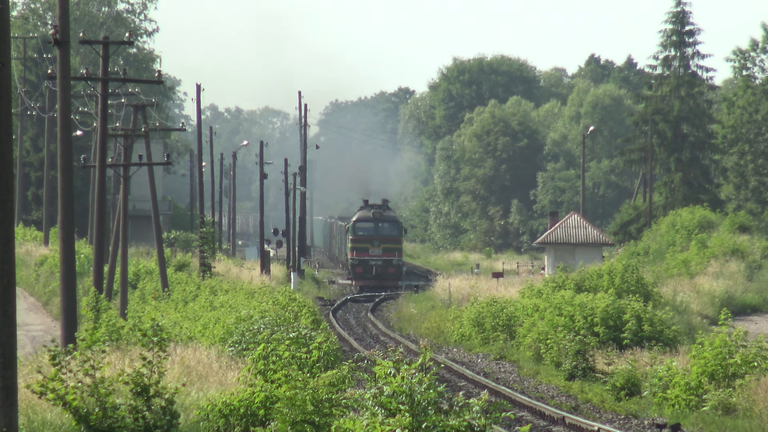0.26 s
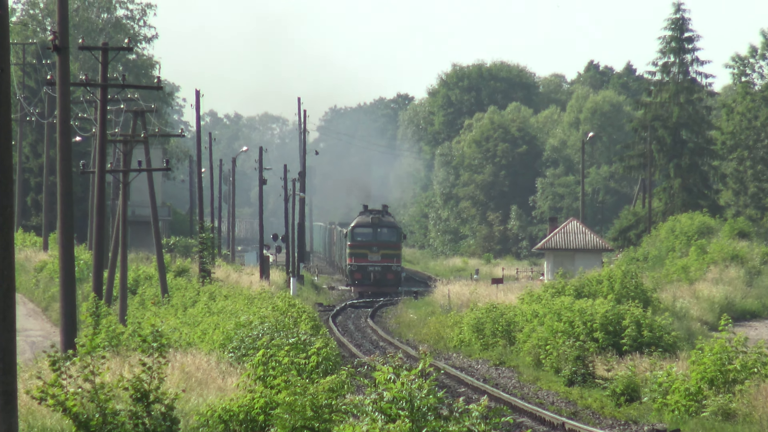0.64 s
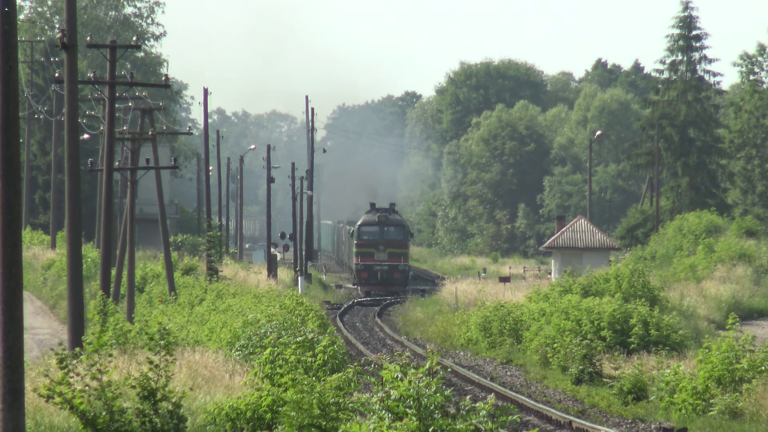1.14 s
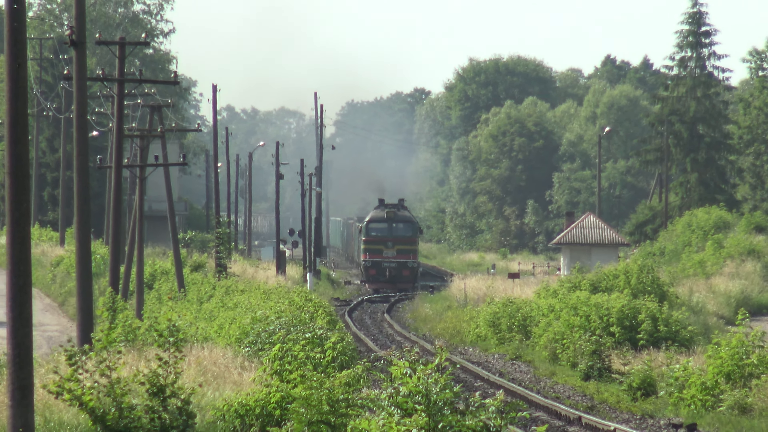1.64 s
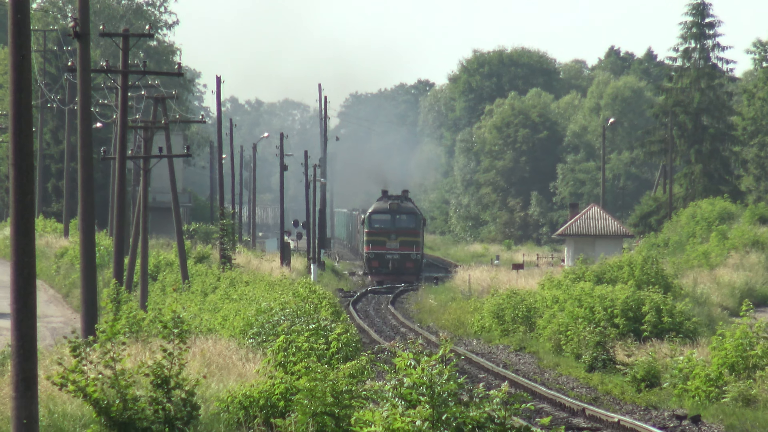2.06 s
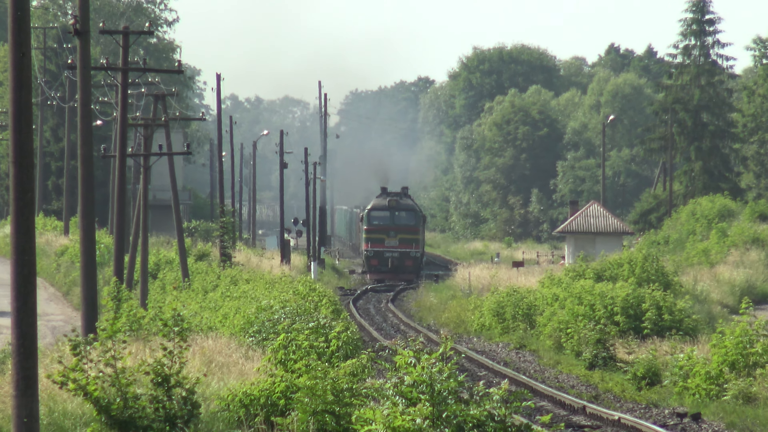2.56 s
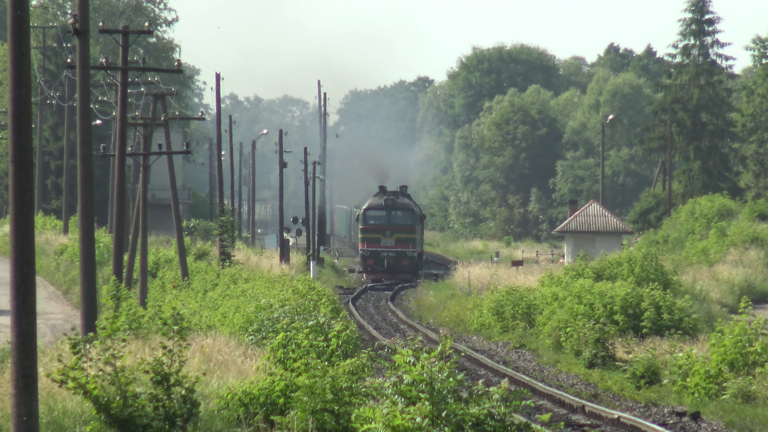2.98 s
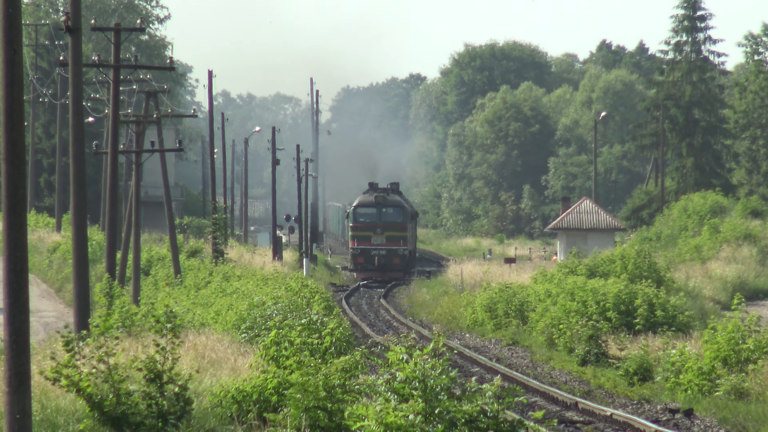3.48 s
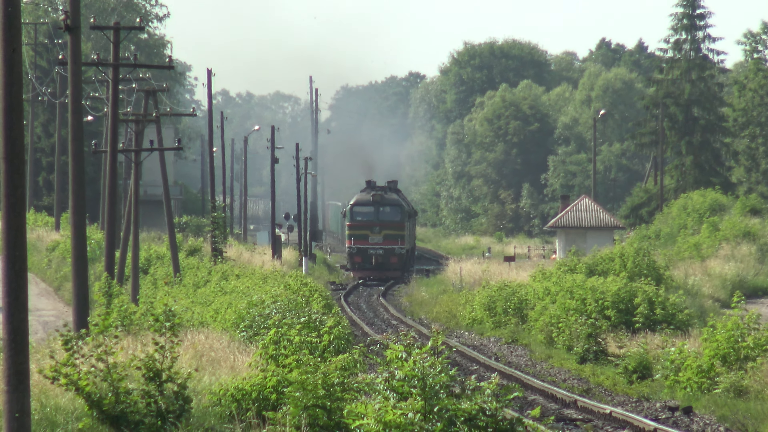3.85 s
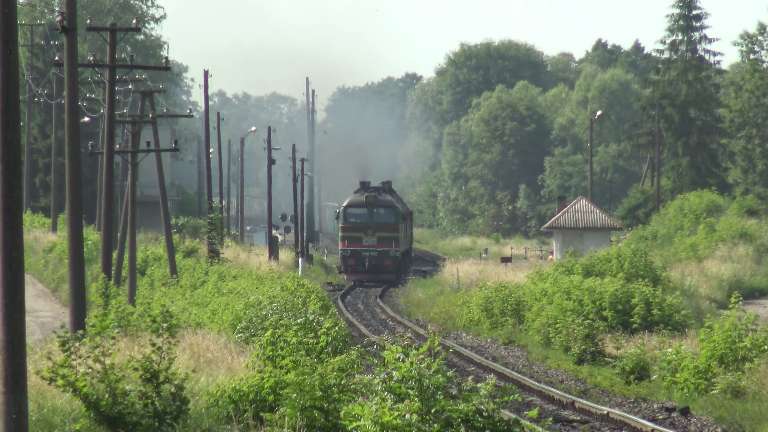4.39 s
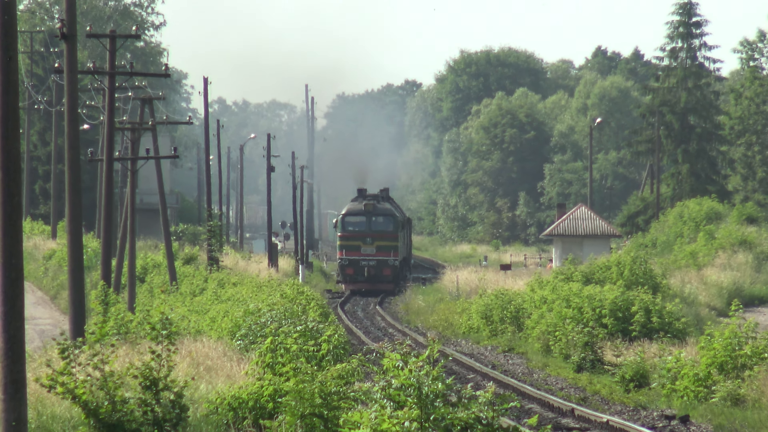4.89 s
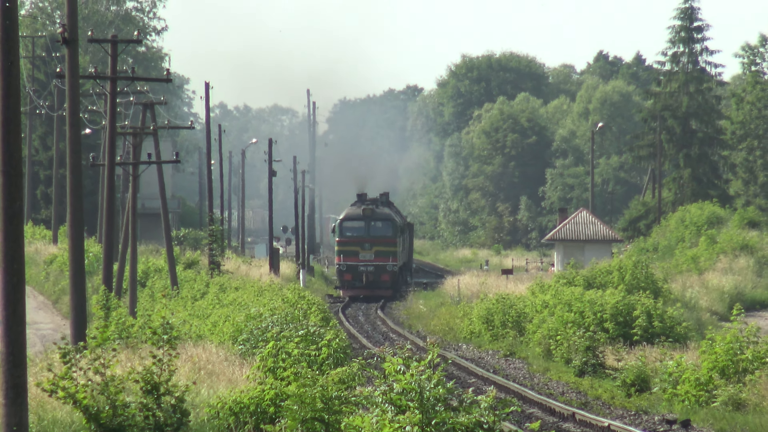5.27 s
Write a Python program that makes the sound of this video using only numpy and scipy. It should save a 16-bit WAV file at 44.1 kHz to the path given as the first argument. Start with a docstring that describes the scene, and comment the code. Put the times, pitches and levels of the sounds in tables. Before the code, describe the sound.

Very low throbbing diesel rumble and a wide airy roar continue outdoors, with a faint wandering whine and quick bird chirps on top.

```python
"""In a wooded cutting, a two-engine diesel locomotive hauls a freight train towards a far microphone.
Two near-sine firing tones boom and throb over a fuzzy hum and the wavering shaft orders of both engines.
A wide roar of shaped noise surrounds them, crossed by a faint wandering whine.
Small birds chirp in the bushes as gliding sines with an echo tail; there are two faint, very high
ticks of noise, and the microphone hisses faintly."""
import sys
import numpy as np
from scipy import signal
from scipy.fft import rfft, irfft
from scipy.io import wavfile
from scipy.ndimage import uniform_filter1d

SR = 44100
rng = np.random.default_rng(int(sys.argv[2]) if len(sys.argv) > 2 else 0)


def file_out(sig):
    """Save sig as 16-bit WAV at sys.argv[1]."""
    # one column per channel
    cols = np.atleast_2d(sig).T
    # limit, then scale
    lim = np.clip(cols, -1, 1)
    pcm = np.round(lim * 32767).astype(np.int16)
    wavfile.write(sys.argv[1], SR, pcm)


N = 243961
TIME_S = np.arange(N) / SR
LEAD_SHAFT_HZ, REAR_SHAFT_HZ = 10.7805, 11.0427


def amp(db):
    """Amplitude factor of a level in dB."""
    return 10 ** (np.asarray(db) / 20)


def evened(x):
    """Scales a signal to unit RMS."""
    return x / np.sqrt(np.mean(x ** 2) + 1e-20)


def sine(phase):
    """A sine of unit RMS."""
    return np.sqrt(2) * np.sin(phase)


def follow(rows):
    """Columns of a timed curve, read at every sample."""
    times, *columns = np.transpose(rows)
    return [np.interp(TIME_S, times, column) for column in columns]


def coloured(white, points, bands=()):
    """Gives unit white noise a density in dB per Hz, with raised bands."""
    freqs = np.fft.rfftfreq(N, 1 / SR)
    hz, db = np.transpose(points)
    shape_db = np.interp(np.log(freqs + 1), np.log(hz + 1), db)
    for centre, width, rise in bands:
        shape_db = shape_db + rise * np.exp(-(2 * (freqs - centre) / width) ** 2)
    return irfft(rfft(white) * amp(shape_db) * np.sqrt(SR / 2), N)


def drift(top_hz, count=1):
    """Slow random wandering of unit RMS, one row each: 16 sines, weaker as they get faster."""
    t = np.arange(0, N + 256, 256) / SR
    hz = np.geomspace(.2, top_hz, num=16)[:, None]
    rows = []
    for start_turns in rng.random((count, 16)):
        waves = np.sin(2 * np.pi * (hz * t + start_turns[:, None])) / np.sqrt(hz)
        rows.append(np.interp(TIME_S, t, evened(waves.sum(0))))
    return np.array(rows)


FIRINGS_PER_TURN, IN_STEP_S = 6, .02  # the two firing tones are in step at IN_STEP_S
REAR_BOOM_DB, REAR_RISE_HZ_PER_S = -20.6, .0029  # the rise is in shaft rate
HUM_HZ, HUM_WIDTH_HZ, HUM_DB = 60.9, 5, -31.5  # fuzzy hum just under the firing tone
# boom of the lead engine's exhaust at the microphone: (time [s], level [dB])
LEAD_BOOM_CURVE = [(0, -7.6), (.19, -15.3), (.27, -8.2), (.42, -15.5), (.46, -8.5), (1.05, -7.4),
                   (1.73, -11.3), (2.19, -5.6), (2.45, -13.3), (2.87, -7.7), (3.05, -10), (3.15, -8),
                   (3.4, -9.8), (4.23, -10.3), (4.64, -6.6), (4.72, -9.5), (5.53, -7.3)]


def firing_tone():
    """Both exhaust stacks sing a near sine at their firing rates and throb against each other."""
    t = TIME_S - IN_STEP_S
    firing_turn = 2 * np.pi * FIRINGS_PER_TURN * t
    lead_level = amp(uniform_filter1d(follow(LEAD_BOOM_CURVE)[0], size=1500))
    lead = lead_level * np.cos(LEAD_SHAFT_HZ * firing_turn)
    # half the rise, because phase is the integral of the rate
    rear_hz = REAR_SHAFT_HZ + REAR_RISE_HZ_PER_S * t / 2
    rear = amp(REAR_BOOM_DB) * np.cos(rear_hz * firing_turn)
    freqs = np.fft.rfftfreq(N, 1 / SR)
    hum_band = np.exp(-((freqs - HUM_HZ) / HUM_WIDTH_HZ * 2) ** 4)
    hum = irfft(rfft(rng.standard_normal(N)) * hum_band, N)
    return np.sqrt(2) * (lead + rear) + amp(HUM_DB) * evened(hum)


# orders of each shaft speed sounded by uneven cylinders, before air and waver:
# (order [multiple of shaft rate], level [dB])
LEAD_SHAFT_ORDERS = [(4, -38), (5, -33), (7, -38), (8, -40.5), (9, -41), (10, -49), (12, -50), (13, -56),
                     (15, -59.5), (16, -48), (17, -47.5), (18, -47), (19, -59), (20, -41.5), (21, -45),
                     (22, -57), (23, -44.5), (24, -44.5), (25, -41), (26, -45), (27, -56), (28, -45),
                     (29, -36.5), (30, -50.5), (31, -48.5), (32, -44.5), (35, -52), (37, -58), (38, -47.5),
                     (40, -62), (42, -58.5), (44, -57.5)]
REAR_SHAFT_ORDERS = [(4, -45), (5, -44), (7, -47.5), (8, -43.5), (9, -43.5), (12, -60.5), (17, -54.5),
                     (18, -52), (25, -58), (36, -60)]
# uneven carry through the air of the cutting, also heard in the roar:
# (time [s], upper shaft orders [dB], treble [dB])
AIR_CARRY = [(0, 0, -2.5), (0.601, -1, -3.5), (1.5, 1, -3), (2, -2, -3.5), (2.499, 0.5, -1), (3.4, -1, -4),
             (4, 2, -3), (4.4, 2.5, -2), (4.8, 2.5, 2), (5.2, 3, -1), (5.53, 0, -1)]


def engine(shaft_hz, orders, waver_db, slip_rad, hunt_turns):
    """Shaft orders; the governor hunts a little and moving air makes each order waver."""
    order, db = np.transpose(orders)[:, :, None]
    turns = shaft_hz * TIME_S + hunt_turns * drift(.8)[0]
    level_drift = drift(2.5, count=len(orders))
    phase_drift = drift(2.5, count=len(orders))
    start = 2 * np.pi * rng.random((len(orders), 1))
    # the low orders bend round everything, so only the upper ones follow the air
    carry_db = follow(AIR_CARRY)[0] * (order > 21)
    level = amp(db + waver_db * level_drift + carry_db)
    return (level * sine(2 * np.pi * order * turns + start + slip_rad * phase_drift)).sum(0)


NEARING_DB_PER_S = 0.08
# roar of exhaust, fans and wheels, with ground-echo dips near 150 and 230 Hz:
# (frequency [Hz], density before the drifting changes [dB per Hz])
ROAR_SPECTRUM = [(14, -41.5), (27, -49.5), (75, -50.5), (110, -61), (150, -68.5), (192, -56.5),
                 (230, -63.5), (300, -61.5), (500, -64), (1300, -74), (2450, -80.5), (4600, -85.5),
                 (5600, -99), (7500, -112)]
# broad singing bands from fans and blowers: (centre [Hz], width [Hz], rise over the roar [dB])
FAN_AND_BLOWER_BANDS = [(1610, 250, 3), (1817, 170, 2.5), (2145, 380, 3.5), (2630, 99, 2.5),
                        (4680, 15, 5.5), (4710, 65, 3.5)]


def roar(patchy_db=0.72, gust_db=0.03, chuff=0.031):
    """Wide noise in drifting patches, lightly puffed at each shaft turn, rising as the train nears."""
    hz, t, spectrum = signal.stft(rng.standard_normal(N), SR, nperseg=512, noverlap=384)
    hz = hz[:, None]
    patches = uniform_filter1d(rng.standard_normal(spectrum.shape), size=6, axis=0)
    patches = evened(uniform_filter1d(patches, size=25, axis=1))
    times, orders_db, treble_db = np.transpose(AIR_CARRY)
    # the growl near 330 Hz swells with the upper shaft orders
    growl = np.exp(-((hz - 330) / 120) ** 2) * np.interp(t, times, orders_db)
    treble = np.clip(hz / 4500, 0, 1) ** 2 * np.interp(t, times, treble_db)
    field_db = growl + patchy_db * patches + NEARING_DB_PER_S * t + treble
    noise = signal.istft(spectrum * amp(field_db), SR, nperseg=512, noverlap=384)[1][:N]
    puffs = 1 + chuff * np.cos(2 * np.pi * LEAD_SHAFT_HZ * TIME_S)
    gusts = amp(gust_db * drift(12.0)[0])
    return coloured(noise * puffs * gusts, ROAR_SPECTRUM, FAN_AND_BLOWER_BANDS)


# faint wandering whine, perhaps a turbocharger:
# (time [s], frequency [Hz], level before its random drift [dB])
WHINE_PATH = [(.5, 2030, -75), (1.2, 2032, -60), (2.1, 1975, -72), (2.85, 1838, -57), (3.3, 1895, -59),
              (3.8, 1820, -60), (5.2, 1795, -65)]


def whine():
    """A thin gliding sine that wanders mostly downwards and fades in and out of the roar."""
    hz, db = follow(WHINE_PATH)
    level = amp(db + drift(top_hz=10)[0])
    return level * sine(2 * np.pi * np.cumsum(hz) / SR)


# bird calls from the bushes: (time [s], length [s], start frequency [Hz], end frequency [Hz],
# level before fades and echo [dB], warble [0-1])
BIRD_CHIRPS = [(0.06, 0.05, 4070, 4120, -58, 0.1), (0.21, 0.03, 4100, 4700, -57, 0.3),
               (0.37, 0.03, 3950, 3850, -54, 0.2), (0.42, 0.03, 3200, 2950, -54, 0.2),
               (0.71, 0.025, 4600, 4150, -55, 0.2), (0.715, 0.025, 3880, 3850, -53, 0.1),
               (0.775, 0.022, 4700, 4250, -52, 0.2), (0.79, 0.022, 3900, 4250, -52, 0.1),
               (0.865, 0.115, 3030, 2970, -52, 0.05), (1.085, 0.036, 4180, 4270, -49, 0.1),
               (1.119, 0.012, 4480, 3320, -50, 0.1), (1.155, 0.035, 3150, 3650, -52, 0.2),
               (1.54, 0.1, 7500, 7300, -74, 0.6), (1.7, 0.03, 3880, 3950, -55, 0.1),
               (2.18, 0.03, 5200, 5000, -58, 0.4), (2.4, 0.03, 4100, 3800, -54, 0.3),
               (2.465, 0.04, 4480, 4250, -50, 0.5), (2.8, 0.04, 4160, 4070, -56, 0.3),
               (3.15, 0.05, 5700, 5000, -61, 0.7), (3.18, 0.04, 3950, 3700, -55, 0.6),
               (3.285, 0.04, 5550, 4950, -58, 0.8), (3.31, 0.03, 4000, 3500, -55, 0.6),
               (3.36, 0.036, 4000, 4000, -53, 0.1), (3.5, 0.13, 7350, 7280, -72, 0.4),
               (4.385, 0.03, 4500, 4200, -53, 0.4), (4.8, 0.04, 3800, 4100, -50, 0.9),
               (4.85, 0.06, 2850, 2650, -52, 0.4), (4.91, 0.045, 3100, 3300, -53, 0.3),
               (4.96, 0.04, 3100, 2900, -50, 0.05), (5.0, 0.06, 2780, 2720, -49, 0.15),
               (5.068, 0.045, 3380, 3050, -51, 0.05), (5.13, 0.17, 7450, 7150, -71, 0.6),
               (5.28, 0.03, 2960, 2750, -54, 0.2), (5.47, 0.03, 2750, 3100, -50, 0.05),
               (5.495, 0.025, 3100, 2600, -50, 0.05)]


def birds():
    """Short gliding whistles with a random warble, smeared by echoes from the trees."""
    direct = np.zeros(N)
    for start_s, length_s, start_hz, end_hz, db, warble in BIRD_CHIRPS:
        n = round(length_s * SR)
        wobble = evened(uniform_filter1d(rng.standard_normal(8000), size=70))[:n]
        glide = uniform_filter1d(np.linspace(start_hz, end_hz, n), size=n // 3)
        hz = glide * (1 + .06 * warble * wobble)
        whistle = amp(db) * sine(2 * np.pi * np.cumsum(hz) / SR) * signal.windows.tukey(n, .4)
        part = direct[round(start_s * SR):][:n]
        part += whistle[:len(part)]
    # a noise tail that falls 60 dB in 0.091 s
    echo = rng.standard_normal(8000) * amp(-60 * np.arange(8000) / SR / 0.091)
    echo /= np.linalg.norm(echo)
    return direct + amp(-9.5) * signal.oaconvolve(direct, echo)[:N]


# two faint, very high ticks: (time [s], starting level before the band filter [dB])
HIGH_TICKS = [(.104, -43), (.452, -42)]


def ticks():
    """Two faint, very high ticks of noise, each falling 60 dB in 4 ms before the band filter."""
    bursts, t = np.zeros(N), np.arange(200) / SR
    for start_s, db in HIGH_TICKS:
        bursts[round(start_s * SR):][:200] += amp(db - 60 * t / .004) * rng.standard_normal(200)
    band = signal.butter(4, (9500, 15500), "band", fs=SR, output="sos")
    return signal.sosfilt(band, bursts)


def scene():
    """The locomotive, its roar and whine, then the birds and ticks, in one channel."""
    lead = engine(LEAD_SHAFT_HZ, LEAD_SHAFT_ORDERS, waver_db=0.77, slip_rad=0.23, hunt_turns=.003)
    rear = engine(REAR_SHAFT_HZ, REAR_SHAFT_ORDERS, waver_db=1.4, slip_rad=0.36, hunt_turns=0.0031)
    locomotive = firing_tone() + lead + rear + roar() + whine()
    return (locomotive + birds() + ticks())[None]


EDGE_HZ = 15760
# hiss of the microphone: (frequency [Hz], density [dB per Hz])
MICROPHONE_HISS = [(3000, -105), (8000, -107), (15000, -109)]


def record(dry):
    """Adds microphone hiss, then limits the band with a steep low-pass filter."""
    wet = dry + coloured(rng.standard_normal(N), MICROPHONE_HISS)
    low_pass = signal.firwin(1023, EDGE_HZ, window=("kaiser", 9), fs=SR)
    return signal.oaconvolve(wet, low_pass[None], "same")


dry = scene()
out = record(dry)
file_out(out)
```